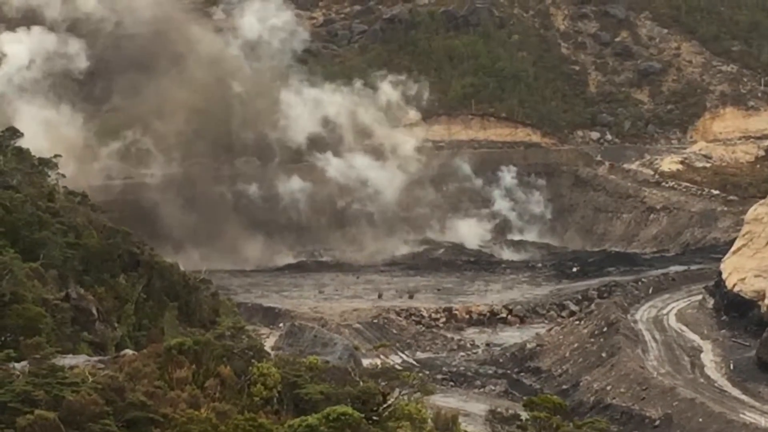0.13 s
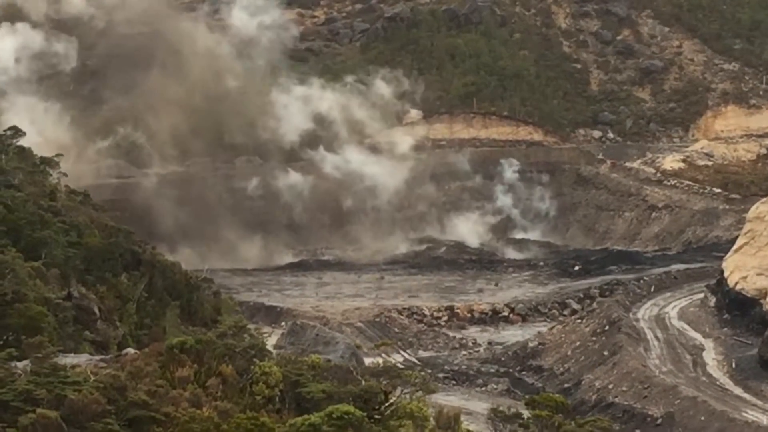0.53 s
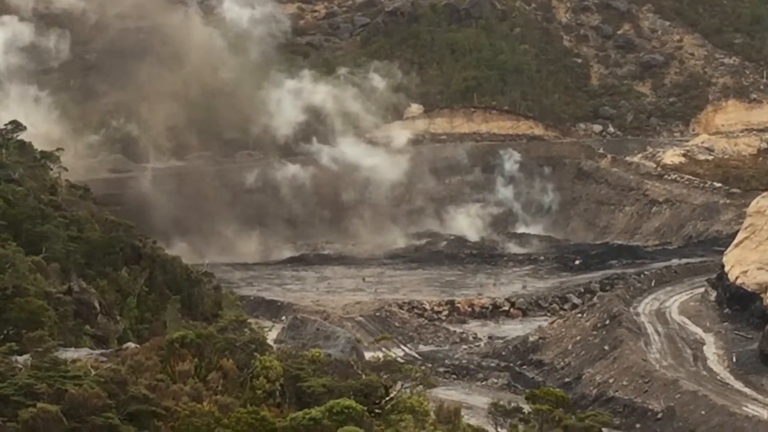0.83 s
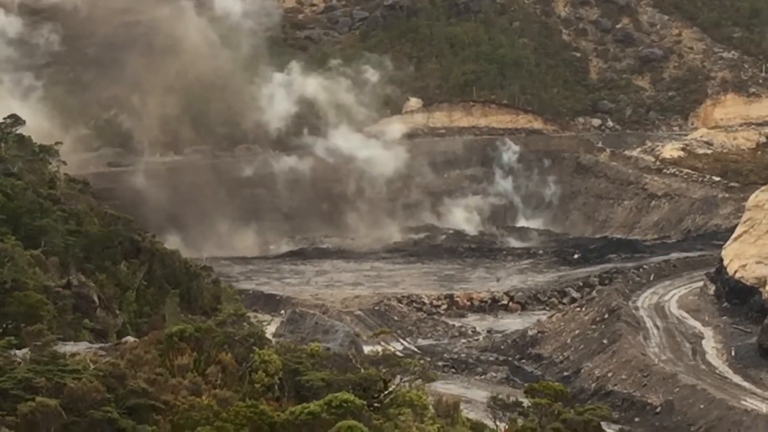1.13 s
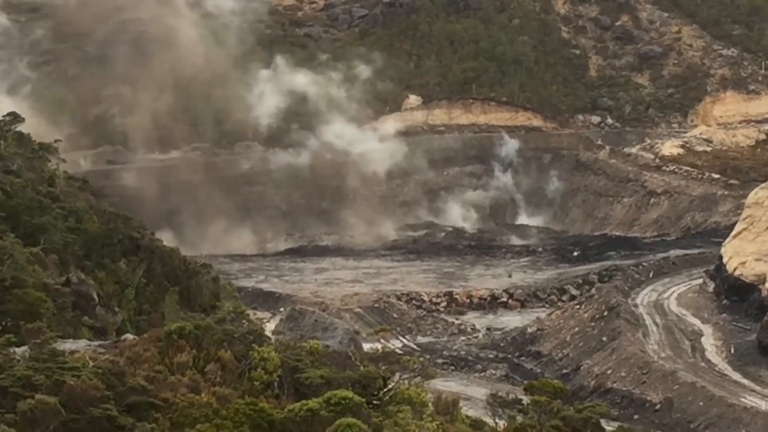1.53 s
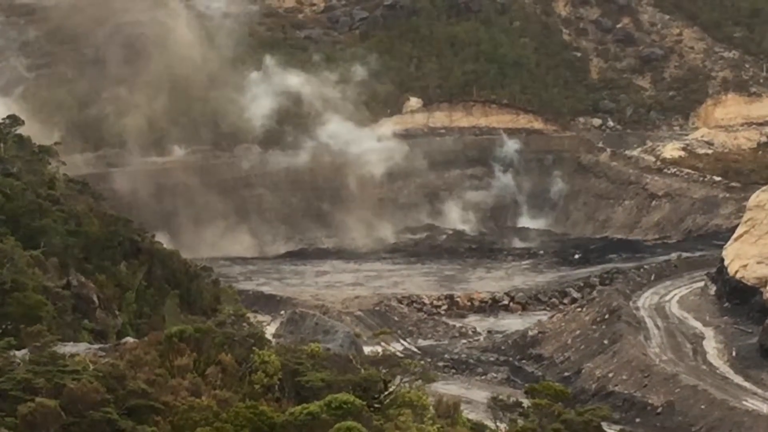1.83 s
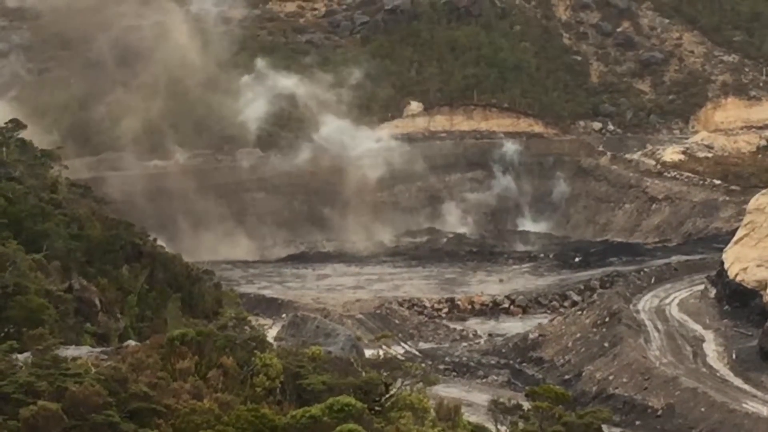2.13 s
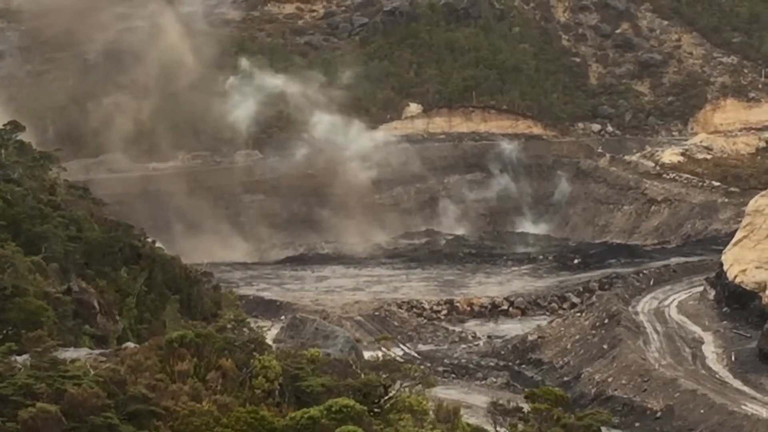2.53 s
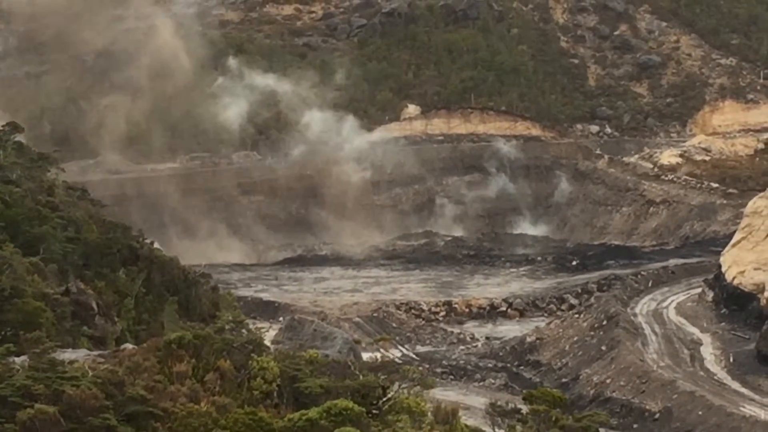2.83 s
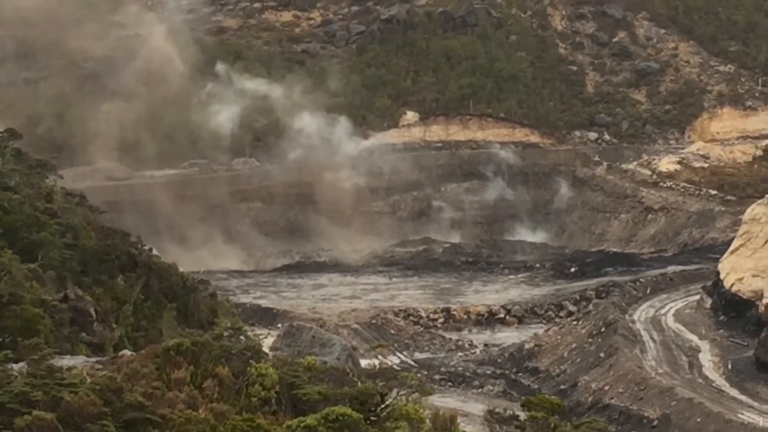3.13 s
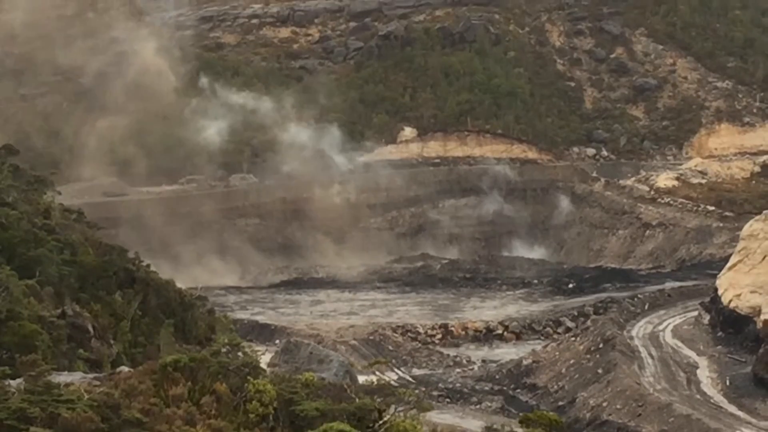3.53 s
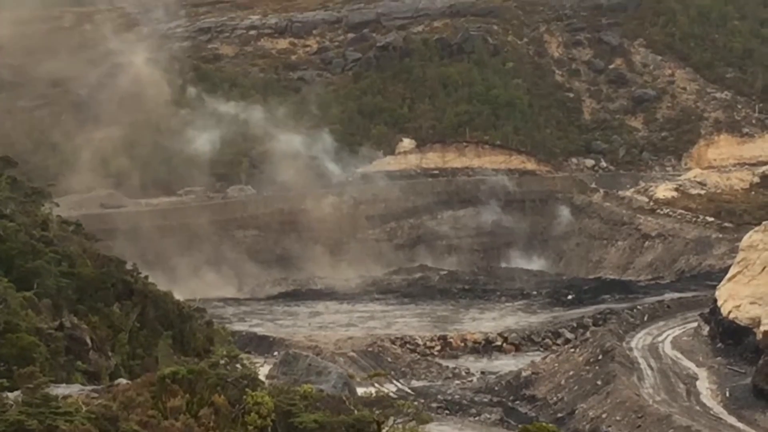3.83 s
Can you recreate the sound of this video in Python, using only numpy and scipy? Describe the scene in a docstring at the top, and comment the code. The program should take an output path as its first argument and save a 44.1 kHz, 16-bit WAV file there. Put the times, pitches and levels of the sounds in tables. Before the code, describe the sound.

Gusty wind thumps and flutters on a microphone above an open quarry pit. Short ticks sound close by while a faint, distant hiss fades. Near the end the gust grows stronger and brighter, with a light crackle.

```python
"""Gusty wind on a microphone above an open quarry pit just after a blast.
From the start, large eddies thump on the capsule and small ones flutter, over a hiss from the pit.
Short ticks and pops sound close by throughout, the loudest at 1 s. The hiss fades.
From 3 s the gust grows: the buffeting turns stronger and brighter, and crackles."""
import sys
import numpy as np
from scipy import signal
from scipy.fft import rfft, irfft, next_fast_len
from scipy.io import wavfile
from scipy.ndimage import uniform_filter1d, map_coordinates

SR = 44100
rng = np.random.default_rng(int(sys.argv[2]) if len(sys.argv) > 2 else 0)


def bounce(signal):
    """Save signal as a 16-bit WAV file at the path given by the first command-line argument."""
    frames = np.transpose(np.atleast_2d(signal))
    limited = np.clip(frames, -1, 1)
    pcm = np.round(limited * 32767).astype(np.int16)
    wavfile.write(sys.argv[1], SR, pcm)


N = 176400

# Each row: time in seconds, then relative levels in dB of thumping, flutter and bright edge.
GUST_LEVELS = [(0.0, -15.5, -35, -28.5), (0.03, -24.5, -48, -51.5), (0.05, -26, -29, -46),
               (0.11, -24.5, -45.5, -48.5), (0.14, -23.5, -24.5, -33.5), (0.17, -21.5, -40, -40.5),
               (0.21, -28, -42.5, -43), (0.3, -29.5, -43.5, -39), (0.37, -25.5, -33.5, -44),
               (0.47, -28.5, -36.5, -43), (0.52, -24, -33, -38.5), (0.71, -21, -26, -39),
               (0.745, -31, -31, -43), (0.8, -20.5, -25.5, -38), (0.82, -17.5, -28.5, -30),
               (0.91, -23, -28, -35), (0.95, -28, -37.5, -39), (0.99, -23, -28, -49),
               (1.02, -26, -36.5, -47), (1.06, -14, -22.5, -44.5), (1.08, -24.5, -32, -40.5),
               (1.31, -32, -51, -43), (1.34, -22.5, -37.5, -37), (1.63, -36.5, -50.5, -41),
               (1.7, -28, -39.5, -39.5), (1.77, -28.5, -51, -48), (1.83, -23, -43.5, -43.5),
               (1.89, -22, -36.5, -43), (1.99, -20, -37, -48), (2.02, -18.5, -30.5, -48.5),
               (2.09, -21.5, -34.5, -45), (2.17, -24.5, -40.5, -38), (2.19, -19, -32, -30.5),
               (2.22, -24.5, -39, -34), (2.31, -18, -22.5, -31.5), (2.33, -25.5, -32.5, -37.5),
               (2.38, -26, -31, -41), (2.45, -20, -22.5, -39.5), (2.47, -28, -34.5, -54.5),
               (2.54, -21, -30, -28), (2.56, -20, -29.5, -47.5), (2.61, -15.5, -27.5, -34.5),
               (2.65, -20.5, -37.5, -47), (2.71, -23, -24.5, -33.5), (2.77, -21.5, -33.5, -41.5),
               (2.8, -19.5, -23.5, -39), (2.83, -13.5, -27.5, -47), (2.91, -22, -34.5, -35),
               (2.95, -14, -22, -37), (2.97, -26, -25, -27.5), (3.0, -25, -32, -42.5),
               (3.07, -21, -17.5, -23), (3.09, -24, -26.5, -32.5), (3.12, -19, -15, -22.5),
               (3.14, -20.5, -21.5, -34.5), (3.27, -16.5, -15, -20), (3.3, -14.5, -18.5, -34),
               (3.39, -23, -22, -34.5), (3.42, -15, -18, -22), (3.51, -18.5, -14.5, -17.5),
               (3.55, -14.5, -11.5, -16.5), (3.58, -9, -9.5, -19.5), (3.61, -15, -14.5, -17.5),
               (3.67, -15.5, -16, -26), (3.7, -16, -15, -16.5), (3.745, -17, -18.5, -25.5),
               (3.77, -18, -21, -29), (3.8, -20, -23, -33), (3.83, -27.5, -17.5, -26),
               (3.87, -22, -18.5, -25.5), (3.92, -14, -16, -23.5), (3.95, -23, -19, -27),
               (4.0, -15.5, -14.5, -32)]
# Strongest eddies. Each row: centre in seconds, envelope peak in dB, pitch in Hz, half-width in cycles.
STRONG_EDDIES = [(0.015, -13.5, 135, 0.54), (0.056, -13.5, 157, 0.55), (0.062, -14.5, 238, 0.75),
                 (0.1, -10.5, 132.5, 0.75), (0.143, -16, 297, 0.6), (0.152, -13.5, 133, 0.91),
                 (0.442, -16.5, 107.2, 0.95), (0.525, -22.5, 544, 1.5), (0.553, -25, 528, 1.5),
                 (0.614, -18.5, 546, 1.3), (0.663, -18.5, 600, 0.76), (0.71, -13, 150.4, 0.7),
                 (0.775, -12.5, 269, 0.54), (0.794, -15.5, 528, 0.91), (0.82, -17.5, 950, 1.2),
                 (0.854, -15.5, 826, 0.92), (0.892, -26, 679, 0.89), (0.918, -20, 330, 1.1),
                 (0.997, -19.5, 415, 0.59), (1.048, -15.5, 149, 0.41), (1.056, -14.5, 342, 0.55),
                 (1.14, -16.5, 131, 0.6), (1.338, -19.5, 198.6, 0.6), (1.409, -19.0, 237, 0.4),
                 (1.449, -18.5, 970, 0.82), (1.521, -17.5, 75, 0.71), (1.597, -20.5, 845, 0.93),
                 (1.675, -22.5, 600, 1.2), (1.71, -22, 214, 0.67), (1.746, -19.0, 135, 0.54),
                 (1.823, -16, 144, 0.73), (1.888, -13, 85.3, 1.1), (1.932, -15.5, 201, 0.5),
                 (2.014, -11.0, 192, 0.61), (2.034, -11.5, 238, 0.68), (2.085, -19, 194, 0.73),
                 (2.193, -15, 592, 0.63), (2.245, -15, 151, 0.6), (2.294, -9.5, 192.5, 1.2),
                 (2.447, -18.5, 527, 1.4), (2.449, -15.5, 85.1, 0.98), (2.569, -11, 154, 0.56),
                 (2.609, -7, 237, 0.62), (2.64, -12, 74.3, 1), (2.698, -13.5, 478, 0.53),
                 (2.798, -12.5, 239, 0.5), (2.822, -8.0, 118, 0.81), (2.842, -10.5, 150, 0.5),
                 (2.947, -10.0, 135.3, 0.42), (3.017, -18, 534, 0.52), (3.04, -15, 493, 0.88),
                 (3.072, -9.5, 605, 0.82), (3.121, -8.0, 242, 1.56), (3.224, -4, 151, 0.58),
                 (3.257, -8.5, 352, 0.43), (3.27, -4.5, 214, 1.2), (3.271, -3.5, 539, 0.5),
                 (3.304, -12.5, 431, 0.56), (3.311, -12, 95.2, 0.87), (3.418, -5.5, 128.7, 0.65),
                 (3.423, -6.0, 477, 0.81), (3.57, -4, 189.4, 0.84), (3.581, -2.5, 151.3, 0.65),
                 (3.646, -6.5, 271, 0.76), (3.663, -7.5, 356, 0.41), (3.702, -9, 602, 1),
                 (3.71, -12, 70.1, 0.8), (3.763, -9, 296, 0.26), (3.8, -15, 462, 0.8),
                 (3.891, -13, 301, 0.61), (3.9, -10, 216, 0.55), (3.922, -10.5, 107, 0.75),
                 (3.973, -12.5, 212, 0.91)]
# Each row: time in seconds, relative level in dB, treble gain in dB.
HISS_LEVELS = [(0.0, -40, 3.5), (0.89, -42, 4.5), (1.3, -42.5, 3.5), (2.02, -44, 0.7), (2.12, -43.5, 0.5),
               (2.86, -48, -1.5), (3.13, -51, -1.5), (3.26, -55, 3), (3.48, -55, 3), (3.59, -55, -10),
               (3.72, -60.5, 1.5), (4.0, -61.5, 4)]
# Each row: start in seconds, level in dB, ring pitch in Hz, main T60 in seconds, noise share from 0 to 1.
TICK_EVENTS = [(0.133, -21.5, 2380, 0.02, 0.6), (0.143, -26, 1210, 0.02, 0.5),
               (0.2508, -23.5, 1500, 0.018, 0.6), (0.6744, -26.5, 2400, 0.021, 0.8),
               (0.687, -26, 4000, 0.015, 0.6), (1.0105, -2.5, 2755, 0.011, 0.19),
               (1.0369, -20, 1540, 0.017, 0.5), (1.225, -27, 4800, 0.015, 0.6),
               (1.28, -29, 4500, 0.02, 0.7), (1.3484, -16.5, 1520, 0.027, 0.1),
               (1.3582, -17, 1380, 0.017, 0.3), (1.4515, -23.5, 2350, 0.023, 0),
               (1.5253, -30.5, 1580, 0.019, 0.5), (1.9603, -26, 2430, 0.0096, 0.2),
               (2.0137, -23, 1470, 0.021, 0.4), (2.2577, -11.5, 1510, 0.022, 0.22),
               (2.2961, -16.5, 1150, 0.022, 0.4), (2.4023, -18.5, 1710, 0.024, 0.29),
               (2.4961, -27.5, 1440, 0.026, 0.5), (2.504, -32, 4500, 0.03, 0.6),
               (2.5381, -17, 1250, 0.025, 0.08), (2.594, -24.5, 1340, 0.018, 0.1),
               (2.7007, -20, 1600, 0.014, 0.2), (2.72, -30, 2000, 0.025, 0.6),
               (2.8, -18, 1830, 0.022, 0.47), (2.8848, -20, 1050, 0.025, 0.11),
               (2.905, -23, 1190, 0.025, 0.15), (2.942, -19.5, 1000, 0.02, 0.05),
               (2.9836, -36, 1430, 0.031, 0.8), (3.0689, -31, 1250, 0.019, 0.3),
               (3.1974, -37, 4800, 0.013, 0.4), (3.255, -29, 1300, 0.015, 0.4),
               (3.267, -18, 1300, 0.02, 0.1), (3.2796, -29, 4880, 0.017, 0.4),
               (3.2922, -31.5, 3170, 0.02, 0.6), (3.4685, -25.5, 1360, 0.02, 0.2),
               (3.5164, -23, 1450, 0.012, 0.2), (3.5373, -24.5, 1570, 0.023, 0.5),
               (3.5484, -22.5, 1510, 0.012, 0.5), (3.5655, -26.5, 1480, 0.018, 0.4),
               (3.6057, -26.5, 1300, 0.015, 0.3), (3.6406, -30.5, 1510, 0.013, 0.5),
               (3.6909, -23, 1650, 0.015, 0.2), (3.699, -20.5, 1200, 0.018, 0.3),
               (3.7194, -33, 1400, 0.016, 0.2), (3.7394, -31, 1400, 0.013, 0.2),
               (3.8696, -26, 1220, 0.012, 0.17)]
# Spectral shapes. Each row: frequency in Hz, gain in dB.
THUMP_EQ = [(15, -35), (30, -9.5), (60, -1.5), (130, 0.5), (250, 1), (500, -16), (1500, -8)]
FLUTTER_EQ = [(120, -14), (220, -3.5), (400, -0.5), (600, 0), (1000, -18), (2000, -47.5), (5000, -65)]
EDGE_EQ = [(300, -29.5), (550, -5.5), (800, -4.5), (1300, -7.5), (2200, -18), (4000, -39), (6500, -55.5),
           (8500, -83.5)]
CRACKLE_EQ = [(1000, -27.5), (2000, 4.5), (3500, -13.5), (6000, -22), (9000, -34.5)]
HISS_EQ = [(180, -35), (300, -2), (414, -20), (641, -9), (967, -8), (1100, -11), (1580, -10), (2040, -16),
           (2380, -12.5), (2570, -16.5), (2920, -16.5), (4240, -20.5), (6480, -31.5), (8420, -69.5),
           (14300, -120)]
MIC_EQ = [(15, -21), (30, -7), (50, 1), (3000, 1.5), (5000, -8), (6500, -14), (8500, -29), (12000, -44.5)]
SELF_NOISE_EQ = [(5000, -20.5), (7500, 0.5), (10000, -3), (11300, -3), (15000, -3.5)]


def amp(db):
    return 10 ** (np.asarray(db) / 20)


def unit_rms(x):
    return x / np.sqrt(np.mean(x ** 2) + 1e-20)


def curves(rows):
    """Per-sample curve for each column after the time."""
    times_s, *columns = np.transpose(rows)
    return [np.interp(np.arange(N) / SR, times_s, column) for column in columns]


def wobble(rate_hz):
    """Smooth random curve, rate_hz knots a second."""
    knots = rng.standard_normal(int(N * rate_hz / SR) + 4)
    return map_coordinates(knots, [np.arange(N) * rate_hz / SR])


def equalise(x, points):
    """Filter through (Hz, dB) points on a log frequency axis."""
    size = next_fast_len(N + 8192)
    hz, db = np.transpose(points)
    gain_db = np.interp(np.log(np.fft.rfftfreq(size, 1 / SR) + 1), np.log(hz + 1), db)
    return irfft(rfft(x, size) * amp(gain_db), size)[:N]


def noise(points):
    return unit_rms(equalise(rng.standard_normal(N), points))


def pulses(centre_s, gain, hz, phase_rad, cycles):
    """Pressure pulses: cosines under Gaussian bells of half-width cycles."""
    reach = int(min(6.5 * np.max(cycles) * SR / np.min(hz), 3000))
    offsets = np.arange(-reach, reach)
    turns = offsets / SR * hz[:, None]
    waves = gain[:, None] * np.cos(2 * np.pi * turns + phase_rad[:, None]) * np.exp(-(turns / cycles) ** 2)
    index = np.clip(np.round(centre_s * SR).astype(int)[:, None] + offsets + 1, 0, N + 1)
    return np.bincount(index.ravel(), waves.ravel(), N + 2)[1:N + 1]


def eddies(count, centre_hz, log_spread, scatter_db, cycles):
    """Eddies of scattered scale and strength pass the capsule."""
    when, strength, phase = rng.random((count, 3)).T
    hz = centre_hz * np.exp(log_spread * np.clip(rng.standard_normal(count), -1.5, 2.5))
    gain = amp(-scatter_db * np.log(strength + 0.0011))
    return unit_rms(pulses(when * N / SR, gain, hz, 2 * np.pi * phase, cycles))


def wind():
    """Large eddies thump, small ones flutter, the smallest add a bright edge; all swell in shared lumps."""
    thump_db, flutter_db, edge_db = curves(GUST_LEVELS)
    lumps = wobble(21)
    large = eddies(count=700, centre_hz=99, log_spread=0.64, scatter_db=1.4, cycles=0.44)
    large += 1.05 * noise([(30, 3), (150, -1), (600, -32), (3000, -48.5)])
    small = eddies(count=3000, centre_hz=386, log_spread=0.5, scatter_db=2, cycles=0.43)
    small += 0.52 * noise([(600, -1.5), (3000, -21.5)])
    smallest = eddies(count=5000, centre_hz=805, log_spread=0.44, scatter_db=2, cycles=0.62)
    smallest += 0.42 * rng.standard_normal(N)
    heave = amp(0.45 * lumps + 0.39 * wobble(27))
    ruffle = amp(0.98 * lumps + 1.3 * wobble(40))
    thump = amp(thump_db - 2.5) * unit_rms(equalise(large, THUMP_EQ) * heave)
    flutter = amp(flutter_db - 4) * unit_rms(equalise(small, FLUTTER_EQ) * ruffle)
    edge = amp(edge_db - 3.5) * unit_rms(equalise(smallest, EDGE_EQ) * ruffle)
    return thump + flutter + edge + strong_eddies() + gust_crackle(edge_db, ruffle)


def pit_hiss():
    """Far hiss from the pit, with patches of random gain and short faint bursts."""
    spectrogram = signal.stft(rng.standard_normal(N), nperseg=512)[2]
    patches = uniform_filter1d(rng.standard_normal(spectrogram.shape), 8, axis=0)
    patches_db = 1.3 * unit_rms(uniform_filter1d(patches, 6, axis=1))
    air = unit_rms(signal.istft(spectrogram * amp(patches_db), nperseg=512)[1][:N])
    bursts_db = 3.6 * np.clip(wobble(60) - 0.6, 0, 1) + 0.7 * wobble(22)
    level_db, treble_db = curves(HISS_LEVELS)
    hiss = unit_rms(equalise(air * amp(bursts_db), HISS_EQ))
    treble = equalise(hiss, [(2000, -27.5), (4500, 0)])
    return amp(level_db + 3) * (hiss + (amp(treble_db) - 1) * treble)


def strong_eddies():
    """Single eddies hit the capsule, one thump or pop each."""
    centre_s, peak_db, hz, cycles = np.transpose(STRONG_EDDIES)
    phase_rad = 2 * np.pi * rng.random(len(hz))
    return pulses(centre_s, amp(peak_db), hz, phase_rad, np.clip(cycles, 0.3, 1.6)[:, None])


def ticks(size=2048, attack_s=0.0011, ring_t60_s=0.025, relative_width=0.2):
    """Close ticks: a rough ring plus a broad noise burst, dying in milliseconds."""
    track = np.zeros(N + SR)
    t, f = np.arange(size) / SR, np.fft.rfftfreq(size, 1 / SR)
    broad_band = f / (f + 1200) / (1 + (f / 3200) ** 2)
    for start_s, level_db, ring_hz, t60_s, noise_share in TICK_EVENTS:
        ring_band = np.exp(-((f / ring_hz - 1) / relative_width) ** 2)
        burst = unit_rms(irfft(rfft(rng.standard_normal(size)) * broad_band))
        rough = unit_rms(irfft(rfft(rng.standard_normal(size)) * ring_band))
        ring = (1.02 * np.sin(2 * np.pi * ring_hz * t) + 0.3 * rough) * amp(-60 * t / ring_t60_s)
        tick = noise_share * burst + (1 - noise_share) * ring
        rise = 1 - np.exp(-t / attack_s)
        fall = amp(-60 * t / t60_s) + 0.12 * amp(-60 * t / (3 * t60_s))
        track[round(start_s * SR):][:size] += amp(level_db) * tick * rise * fall
    return track[:N]


def gust_crackle(edge_db, ruffle):
    """Crackle in hard gusts; swells faster than the bright edge."""
    level_db = -42.5 + 1.6 * (edge_db + 18)
    fizz = noise(CRACKLE_EQ) * ruffle
    flicker_db = 6.3 * np.clip(wobble(120), -2, 1.8)
    return amp(level_db) * unit_rms(fizz * amp(flicker_db))


def scene():
    return (wind() + pit_hiss() + ticks())[None]


def record(dry):
    """Soft ceiling, dull microphone, faint self-noise, band limit."""
    ceiling, self_noise_db, cutoff_hz = 0.8, -78.5, 15300
    limited = dry[0] / (1 + np.abs(dry[0] / ceiling) ** 4) ** (1 / 4)
    fade_in = np.minimum(np.arange(N) / 90, 1)
    mic = equalise(limited * fade_in, MIC_EQ) + amp(self_noise_db) * noise(SELF_NOISE_EQ)
    passband = np.fft.rfftfreq(2 * N, 1 / SR) < cutoff_hz
    return irfft(rfft(mic, 2 * N) * passband)[None, :N]


dry = scene()
out = record(dry)
bounce(out)
```